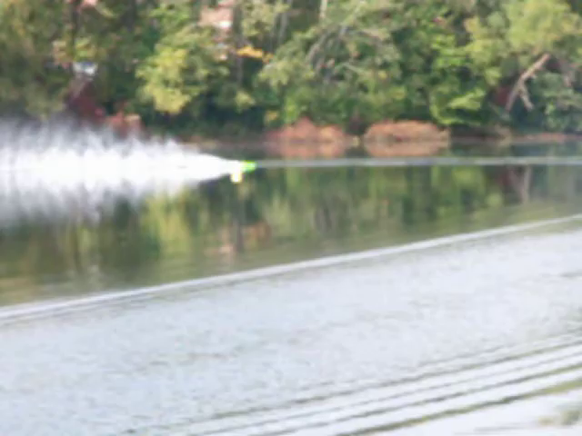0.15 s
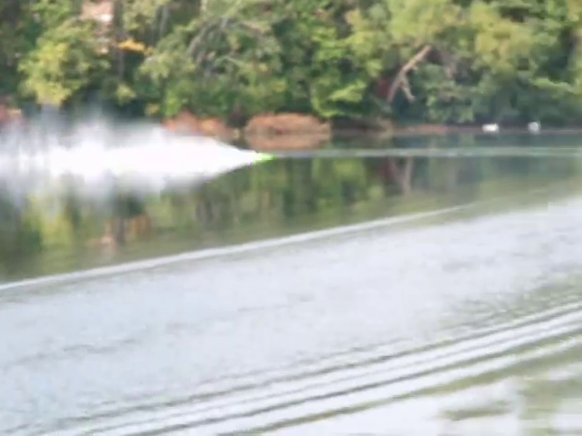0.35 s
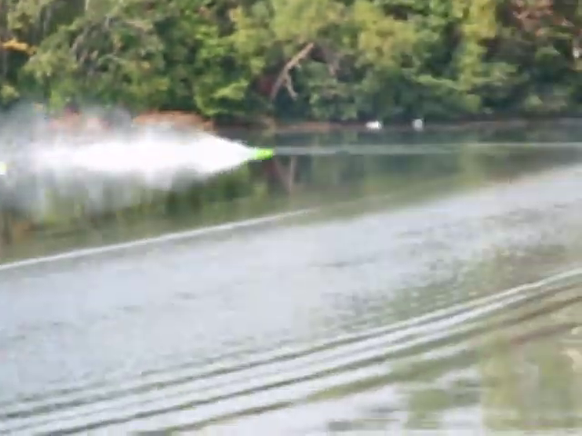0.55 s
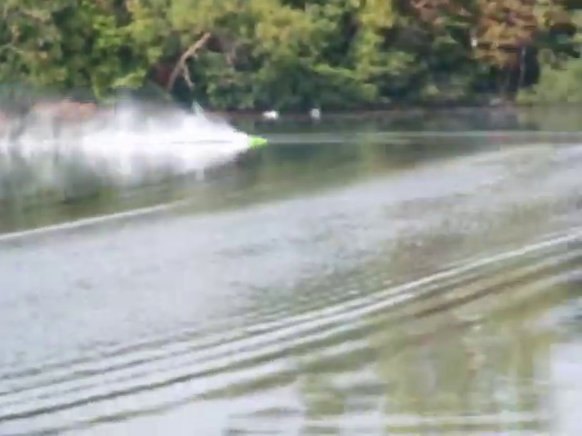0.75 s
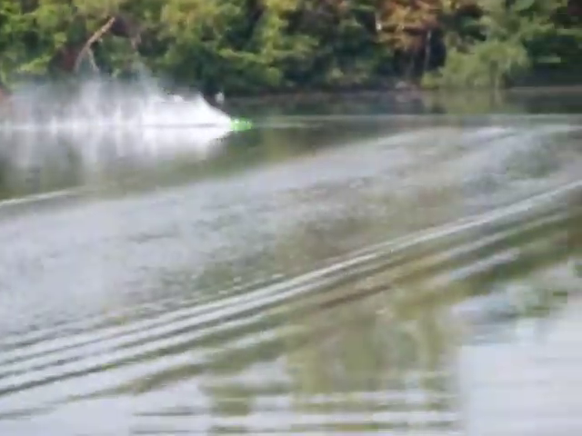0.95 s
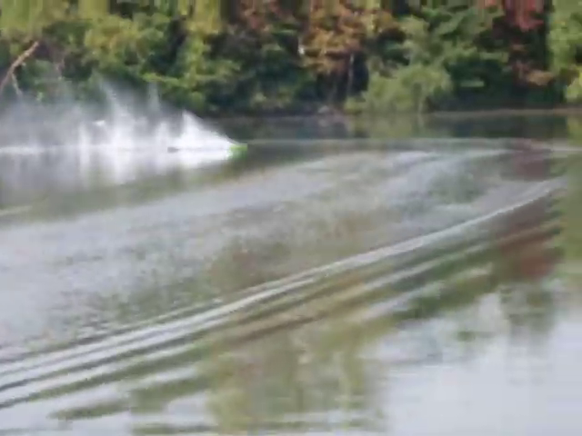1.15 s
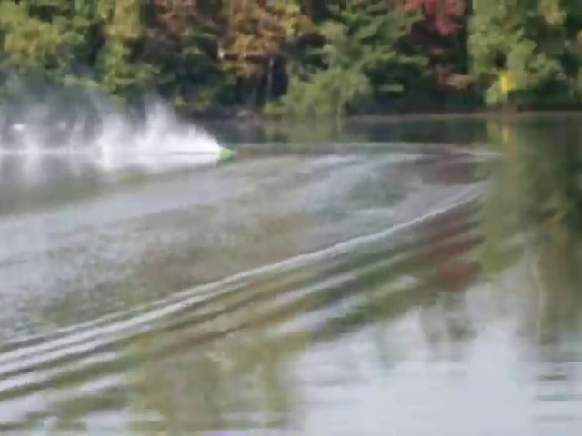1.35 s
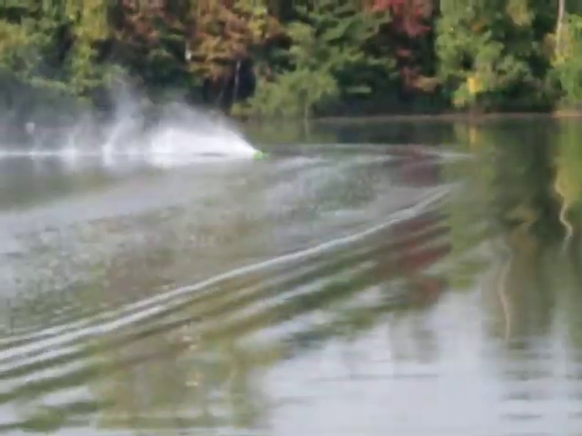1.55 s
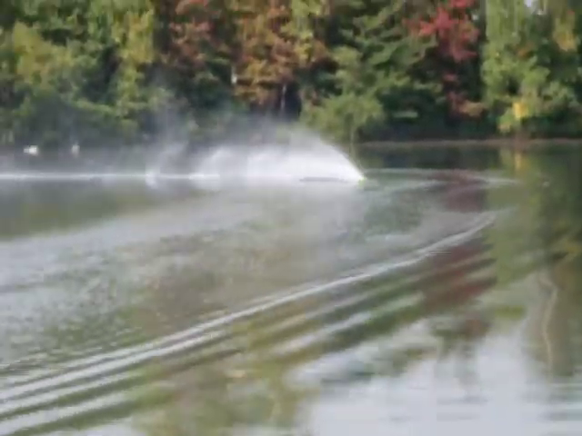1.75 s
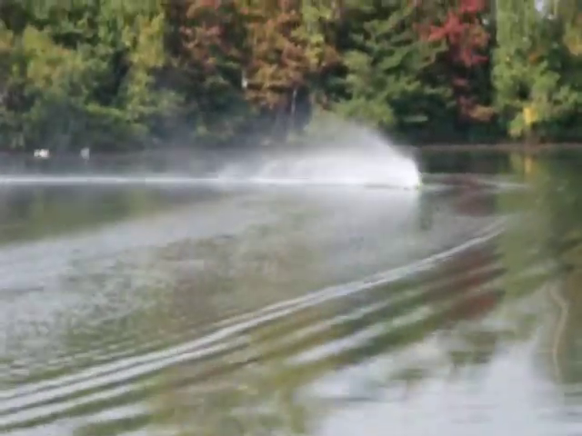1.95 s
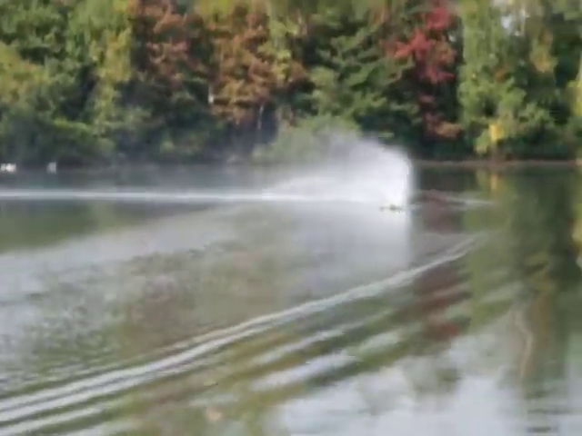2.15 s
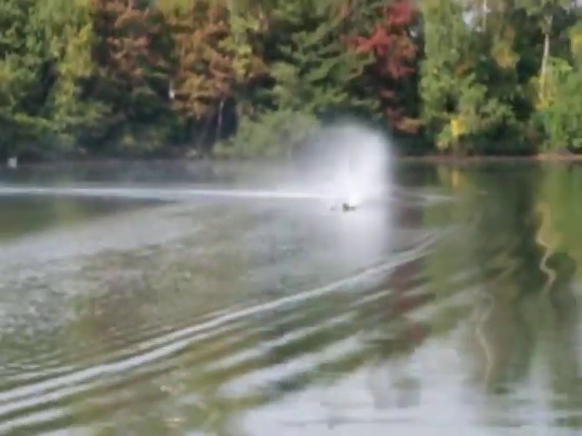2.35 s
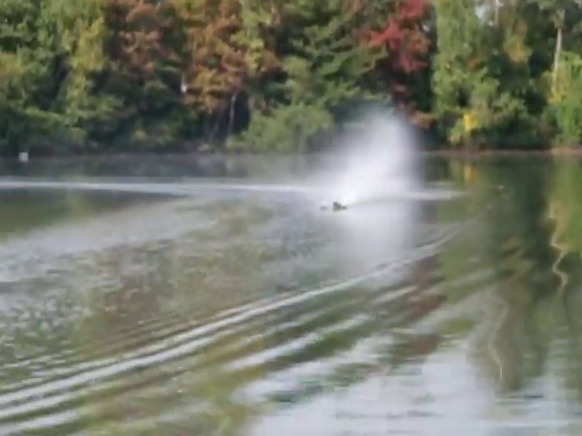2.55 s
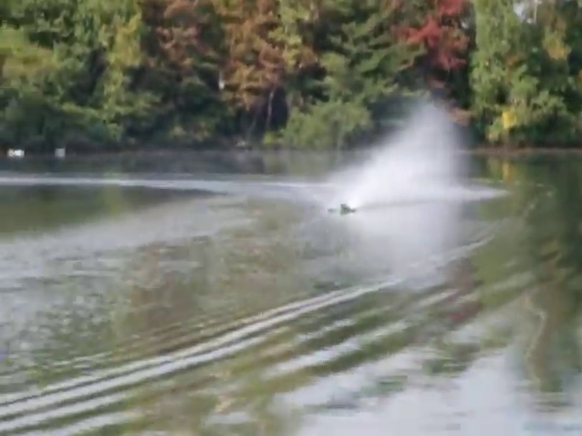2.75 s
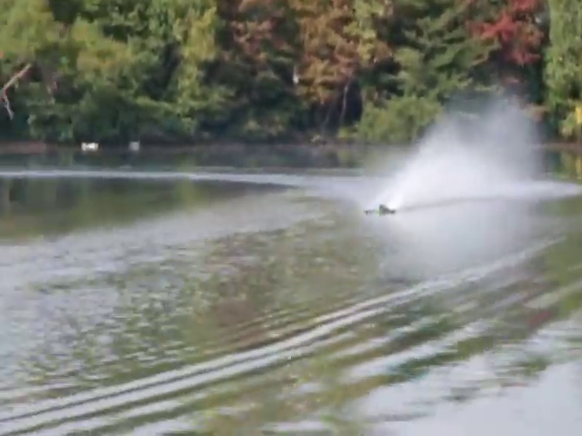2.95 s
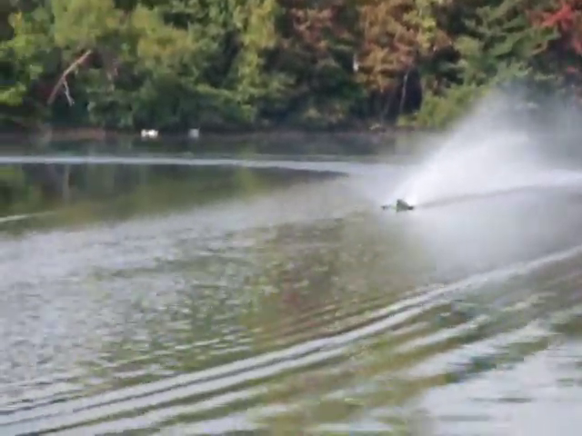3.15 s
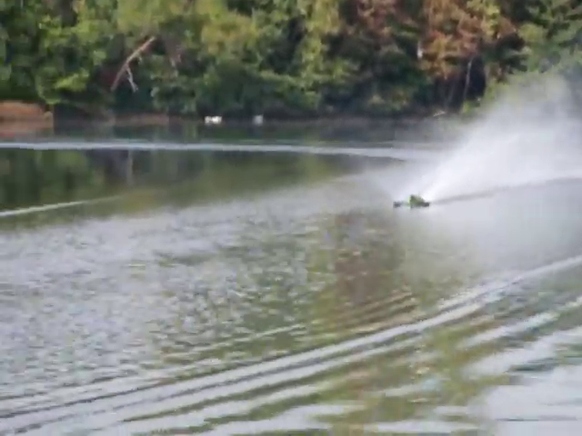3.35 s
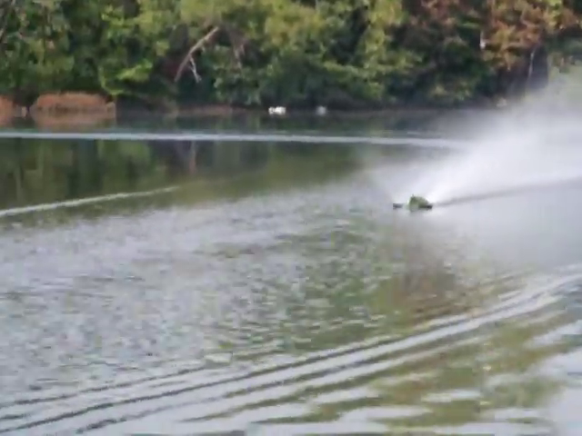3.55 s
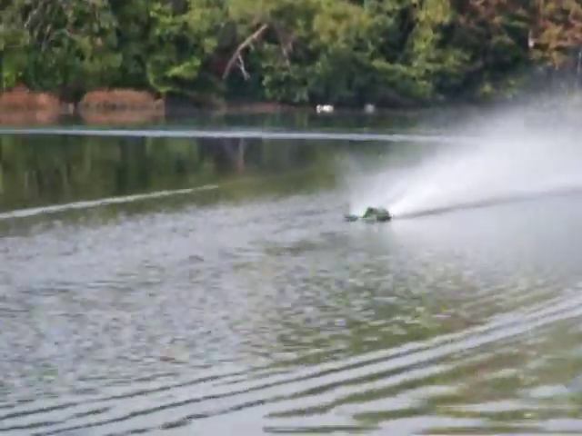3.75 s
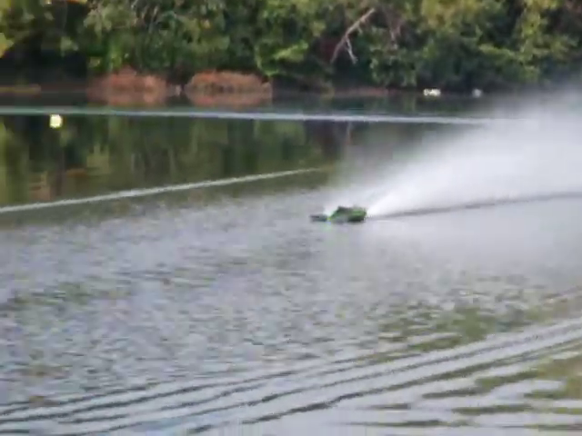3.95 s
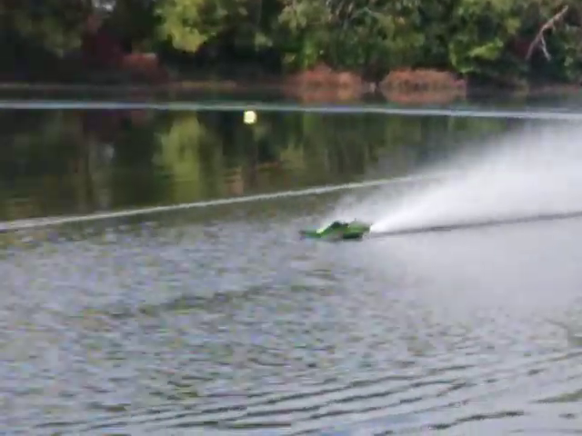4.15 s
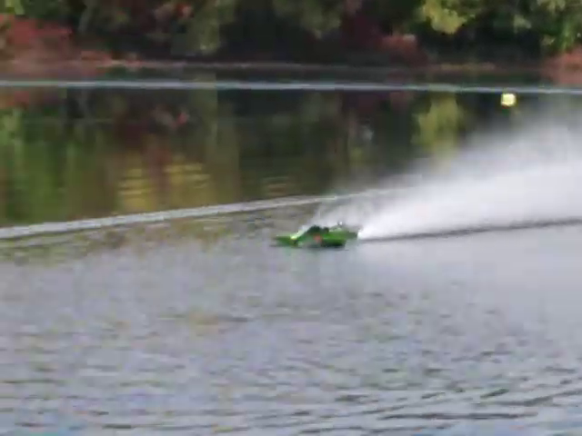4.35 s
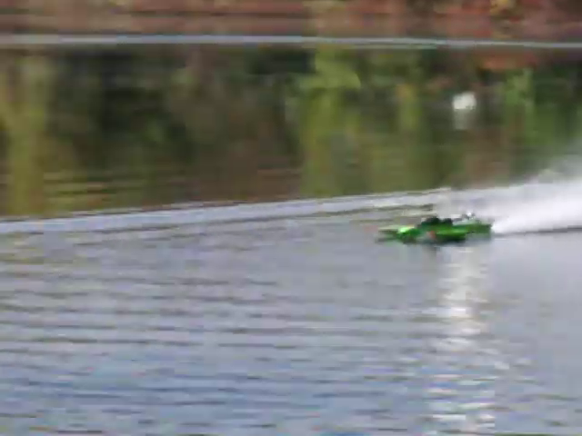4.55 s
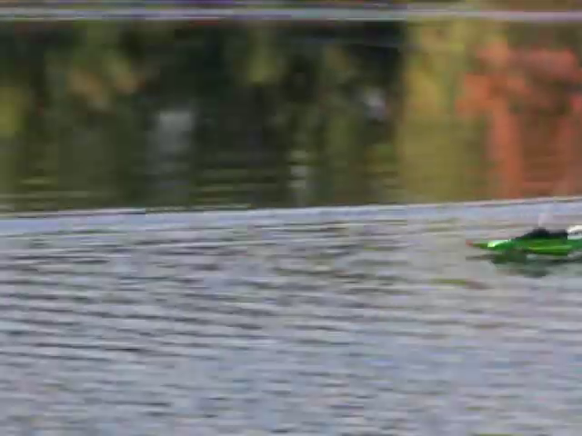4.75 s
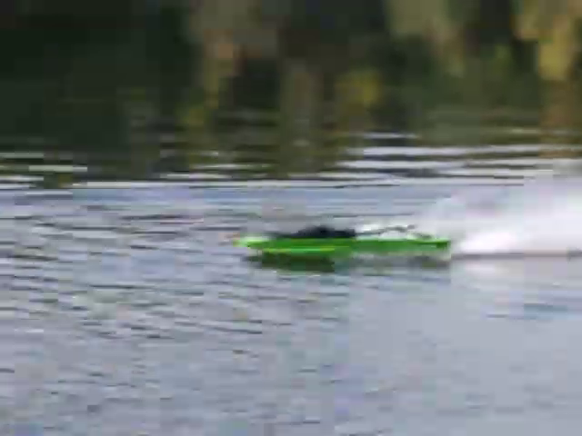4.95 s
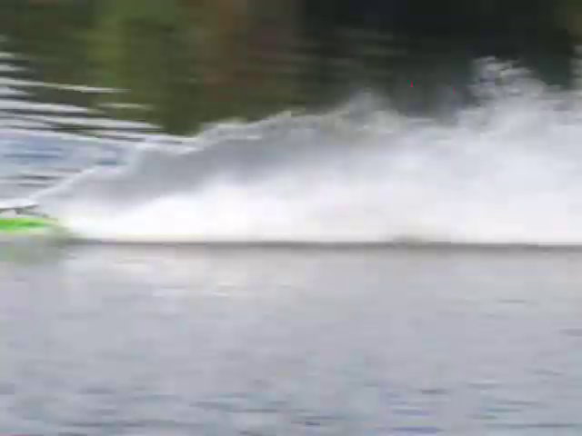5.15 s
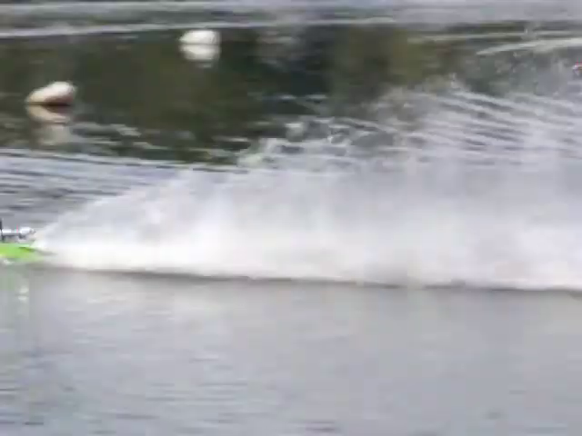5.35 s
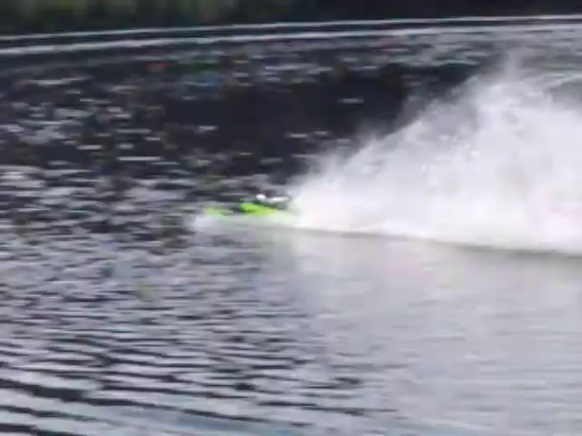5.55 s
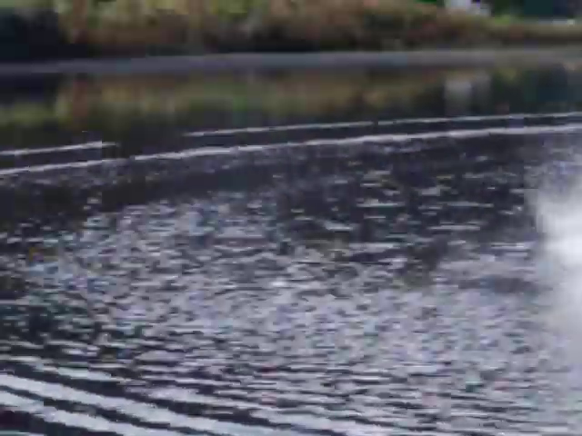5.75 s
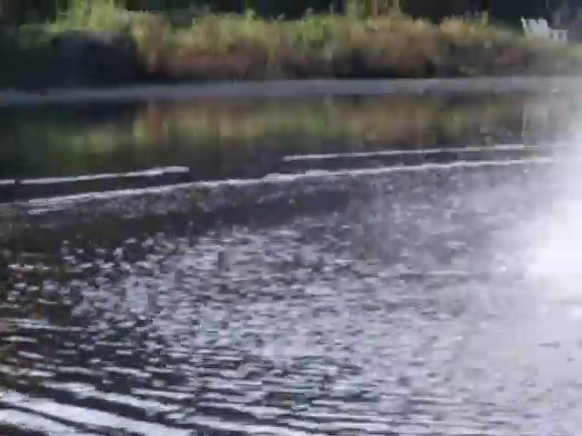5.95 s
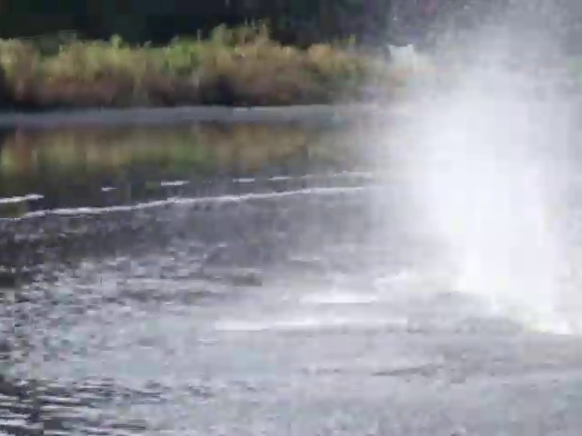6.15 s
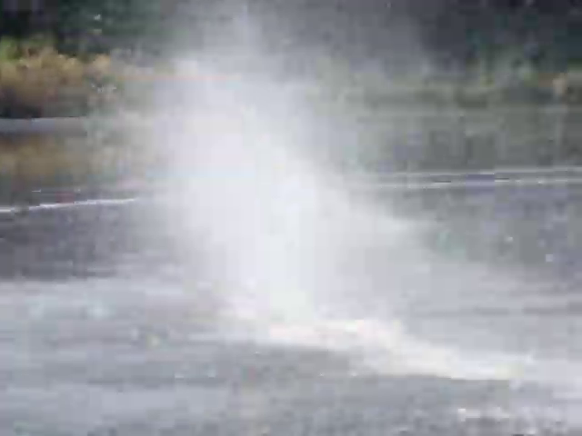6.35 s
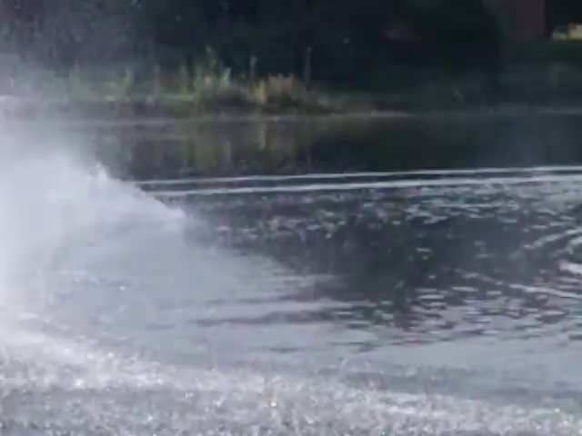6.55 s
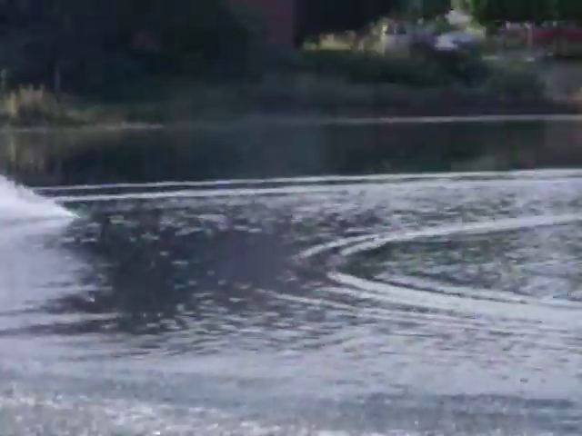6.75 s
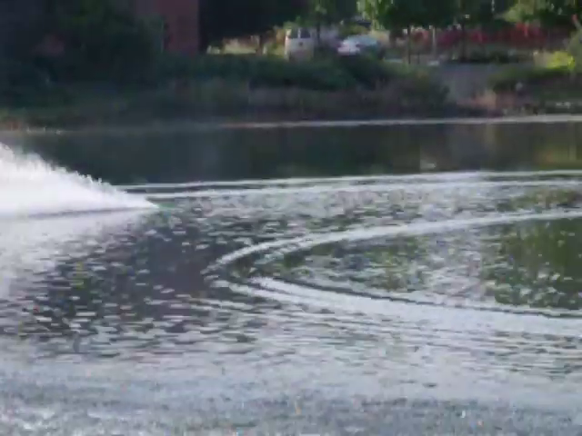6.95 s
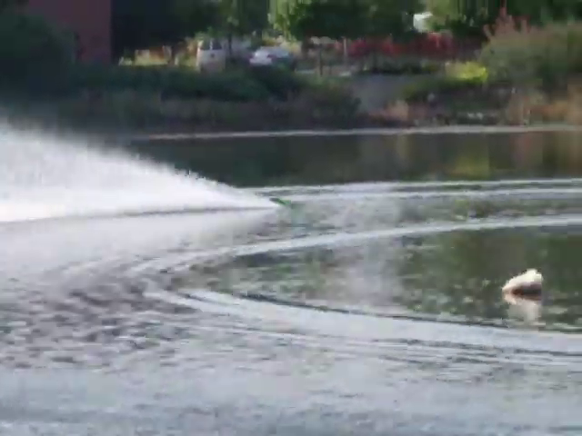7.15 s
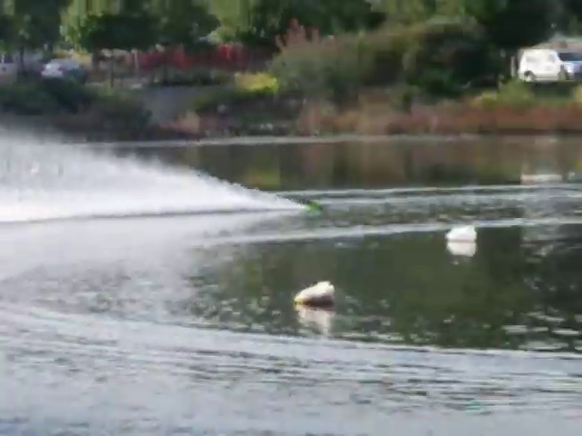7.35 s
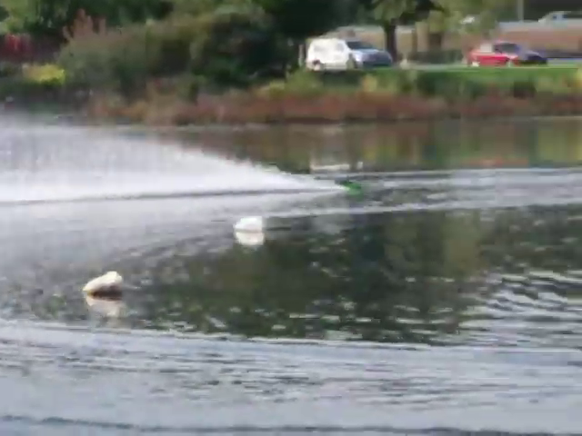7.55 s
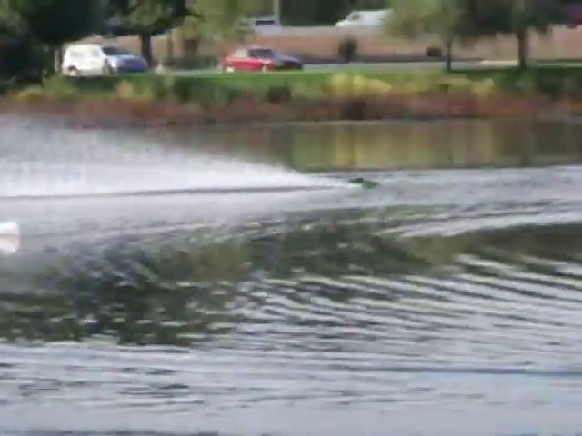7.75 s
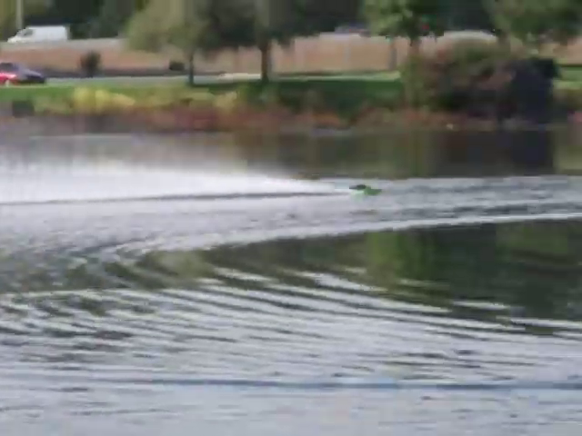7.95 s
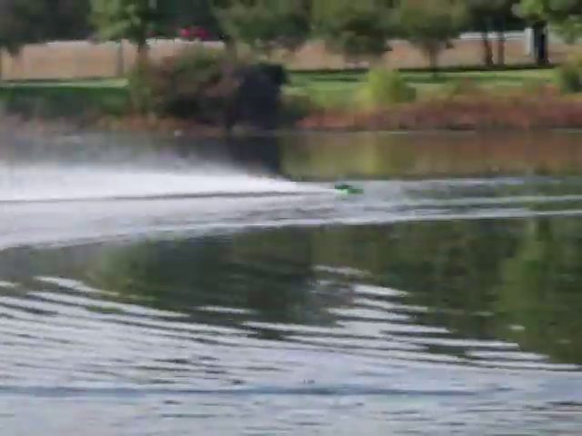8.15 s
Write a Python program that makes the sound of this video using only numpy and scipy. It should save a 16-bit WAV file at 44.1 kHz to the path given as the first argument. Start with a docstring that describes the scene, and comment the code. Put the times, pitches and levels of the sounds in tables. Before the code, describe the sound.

A small two-stroke model racing boat whines across a pond throughout, heard from the bank with rushing, hissing spray and a thin echo off the shore. Three tiny ticks sound by the microphone right at the start. From about 0.3 to 1.6 seconds the revs flare and sag rapidly as the hull skips. The high, buzzing whine then steadies and grows louder as the boat approaches. Two faint, short rising hoots come at about 3.3 and 4.6 seconds. Between 4.7 and 6 seconds the boat passes close and loud, with strong spray hiss, a low buffeting and slight overload; the revs flare again in quick bursts from 5.3 seconds while the pitch falls. After 6.5 seconds the engine carries on lower and quieter as the boat heads away, until about 8 seconds. A faint, low motor drones far off underneath.

```python
"""From the bank of a pond: a two-stroke racing model boat rounds the far end, tuned pipe whining, revs
flaring as the hull skips and the propeller loses grip. Spray hisses, the wooded shore scatters the treble
back, a distant motor drones and three ticks sound by the microphone. Two faint hoots rise as the boat
nears. Past five seconds it runs close by, skipping again, with a low buffeting, and overloads the
microphone; then its pitch drops and it heads away."""
import sys
import numpy as np
from scipy import signal
from scipy.fft import rfft, irfft, next_fast_len
from scipy.io import wavfile
from scipy.ndimage import uniform_filter1d

SR = 44100
rng = np.random.default_rng(int(sys.argv[2]) if len(sys.argv) > 2 else 0)


def wav_out(sig):
    """Save sig, one row per channel (or a flat mono array), as 16-bit PCM at SR to the path in sys.argv[1]."""
    wavfile.write(sys.argv[1], SR, np.round(np.clip(np.atleast_2d(sig).T, -1, 1) * 32767).astype(np.int16))


N = 361619
TIME = np.arange(N) / SR


def from_db(db):
    """Decibels as an amplitude factor."""
    return 10 ** (np.asarray(db) / 20)


def rms_one(x):
    """x scaled to rms 1."""
    return x / np.sqrt(np.mean(x ** 2) + 1e-20)


def in_time(rows):
    """A table's columns at every sample, joined by straight lines."""
    times, *columns = np.transpose(rows)
    return [np.interp(TIME, times, column) for column in columns]


def at_hz(spectrum, hz):
    """A spectrum's level in dB, read on a log-frequency axis."""
    known_hz, db = np.transpose(spectrum)
    return np.interp(np.log(hz), np.log(known_hz), db)


def drift(rate_hz):
    """Slow random wander, rms 1: noise at every 20th sample through a double one-pole low-pass."""
    pole = np.exp(-40 * np.pi * rate_hz / SR)
    noise = rng.standard_normal(N // 20 + 4002)
    slow = signal.lfilter([1], [1, -2 * pole, pole * pole], noise)[4000:]
    return np.interp(np.arange(N) / 20, np.arange(len(slow)), rms_one(slow))


def butter(x, hz, kind, order=2):
    """x through a flat-passband filter."""
    return signal.sosfilt(signal.butter(order, hz, kind, fs=SR, output="sos"), x)


def coloured(x, spectrum):
    """x shaped by a spectrum; rms 1."""
    size = next_fast_len(N)
    hz = np.maximum(np.fft.rfftfreq(size, 1 / SR), 1)
    return rms_one(irfft(rfft(x, size) * from_db(at_hz(spectrum, hz)), size)[:N])


def revs(recover_s=.05, flywheel_s=0.016):
    """Firing rate and its flare, in Hz: at each skip the engine races, then bogs as the propeller bites."""
    # firing rate with the propeller gripping, as heard on the bank: t/s, f/Hz
    cruise = [(0.0, 393.6), (0.24, 405.6), (0.52, 401.4), (0.65, 419.2), (0.82, 399.7), (1.68, 404.1),
              (1.87, 422), (2.21, 430), (2.83, 421.4), (2.97, 432), (3.17, 434.3), (3.91, 438.6),
              (4.36, 430.7), (4.76, 432.3), (5.03, 418.7), (5.27, 401.7), (5.61, 385.2), (5.95, 351.4),
              (6.37, 353.7), (6.56, 363.5), (6.81, 372.6), (7.29, 382.8), (7.66, 371.2), (7.72, 365.3),
              (8.2, 361)]
    # hull skips, before the flywheel rounds them: peak t/s, flare/Hz, sag/Hz, time in air/s, time to bite/s
    skips = [(0.33, 18.6, 4.4, 0.055, 0.0446), (0.404, 12, 15, 0.03, 0.035),
             (0.471, 17.5, 14.5, 0.022, 0.057), (0.558, 16.3, 6.2, 0.044, 0.059),
             (0.787, 91, 42, 0.063, 0.024), (0.898, 87, 28, 0.071, 0.02), (1.01, 73, 4.6, 0.057, 0.02),
             (1.097, 31, 33, 0.066, 0.061), (1.264, 35, 25, 0.091, 0.0335), (1.37, 49, 36, 0.035, 0.067),
             (1.491, 31, 10.8, 0.054, 0.059), (1.628, 8.1, 5.67, 0.052, 0.052),
             (5.299, 18.6, 7.8, 0.0234, 0.032), (5.422, 102, 38.5, 0.048, 0.04),
             (5.558, 85, 41, 0.066, 0.023), (5.676, 94, 45, 0.054, 0.042), (5.792, 35, 10.4, 0.058, 0.038),
             (5.906, 44, 2.1, 0.081, 0.04)]
    cruise_hz, = in_time(cruise)
    swings_hz = sum(np.interp(TIME - s, [-air_s, 0, bite_s, bite_s + recover_s], [0, peak_hz, -sag_hz, 0])
                    for s, peak_hz, sag_hz, air_s, bite_s in skips)
    flare_hz = uniform_filter1d(swings_hz, int(flywheel_s * SR))
    return cruise_hz + flare_hz, flare_hz


def crank(firing_hz, hunting=0.001224, jitter=0.003905):
    """Crank angle: the speed hunts a little, and no two firings push equally hard."""
    speed_hz = firing_hz * (1 + hunting * drift(17.85) + jitter * drift(200))
    return 2 * np.pi * np.cumsum(speed_hz) / SR


def exhaust(firing_hz, flare_hz, angle, mach=.057, rough_flare_hz=30, rough_span_s=.2):
    """One blast a turn makes 16 orders that slide through peaks and dips and vary as the boat turns."""
    # tone colour of the engine on board, with its peaks and dips: f/Hz, gain/dB
    colour = [(340.0, -1), (480.0, 7), (700.0, -5), (850.0, 4), (1180.0, 5.0), (1190.0, 0.3), (1630.0, 4.5),
              (2000.0, -14.5), (2300.0, -4), (2610.0, -13), (2900.0, -5.5), (3300.0, 2), (3770.0, -3.5),
              (3870.0, 7), (4590.0, -2.5), (4730.0, -13), (5090.0, -8), (5520.0, -27)]
    # engine at the microphone as the boat nears and leaves: t/s, relative level/dB
    loudness = [(0.0, -28), (0.3, -29.5), (0.45, -32.1), (0.75, -30.5), (1.7, -26.5), (2.5, -23.5),
                (3.2, -23), (3.6, -20.5), (4.15, -17.5), (4.8, -15.5), (5.3, -17), (5.5, -19), (5.8, -19.5),
                (6.1, -17.5), (6.5, -20.5), (6.85, -25.4), (7.1, -23.5), (7.4, -23), (7.7, -24.0),
                (8.2, -24.5)]
    # rough aim of the exhaust, 0 away from the microphone, 180 straight at it: t/s, aim/degrees
    heading = [(0.0, 120.0), (0.5, 120), (1.0, 38), (1.7, 41), (2.0, 44.5), (3.0, 47.2), (3.9, 32),
               (4.4, 34), (4.9, 75), (5.2, 65.3), (5.5, 96), (5.9, 100.5), (6.2, 87.5), (6.6, 155),
               (6.95, 159), (7.4, 107), (7.7, 119), (8.2, 126)]
    # sound sent each way, against order 1: aim/degrees, 2nd/dB, 3rd/dB, 4th/dB, rasp 5-9/dB, whine 10-16/dB
    beam = [(0.0, 6, -7.5, -18.5, -18, 1.7), (44.6, -0.4, -7.5, -8, -3, -7.5),
            (92.2, -5.1, -1.5, -0.2, -5, -4), (136, -13.7, -5, -10.5, -10.5, -3.5),
            (178, 9, -14, 3.5, -9.5, -5)]
    # treble, from the fifth order up: t/s, gain/dB
    treble = [(0.0, -3.0), (0.6, 0.5), (1.7, -3), (2.1, -1.1), (3.7, -0.7), (4.15, 2.5), (4.75, 0.4),
              (5.2, 5), (5.7, 3.5), (5.97, -11), (6.3, -4.5), (6.75, 2), (7.4, -1), (7.6, -4.5), (8.0, 5),
              (8.2, 3.7)]
    loudness_db, aim, treble_db = in_time(loudness) + in_time(heading) + in_time(treble)
    degrees, *lobes = np.transpose(beam)
    second, third, fourth, rasp, whine = [np.interp(aim, degrees, lobe) for lobe in lobes]
    # a racing engine booms, a bogging one growls; factors in dB per Hz of flare
    boom, growl = 0.0384 * flare_hz, -0.0272 * flare_hz
    treble_db -= 0.0019 * flare_hz
    orders_db = [boom, second + boom, third + growl, fourth + growl]
    orders_db += [rasp + treble_db] * 5 + [whine + treble_db] * 7
    # the boat's speed shifts the tone colour heard on the bank
    on_board_hz = firing_hz * (1 - mach * np.cos(np.radians(aim)))
    rough = np.minimum(uniform_filter1d(np.abs(flare_hz), int(rough_span_s * SR)) / rough_flare_hz, 1)
    out = np.zeros(N)
    for k, order_db in enumerate(orders_db, 1):
        # over rippled water short waves flutter most, and more while the hull skips
        flutter_db = (0.76 + 0.0918 * k + 2.0 * rough) * drift(21)
        if k > 2:
            flutter_db += 1.2 * drift(5)   # slower fading
        gain = from_db(loudness_db + order_db + at_hz(colour, k * on_board_hz) + flutter_db)
        out += gain * np.sin(k * angle + np.pi / 5 * k * k)   # the pipe spreads each blast over the turn
    return np.sqrt(2) * out * from_db(-0.25 * drift(150))


def wash(angle, puffing=0.34, splash_db=1.5, surge_db=1.42, rush_gain_db=-1.35, hiss_gain_db=-3.5):
    """Thrown water lands in dense splashes; gas hisses out in a puff with each firing."""
    # the boat's noise from the bank: t/s, relative rush level/dB, relative hiss level/dB
    levels = [(0.0, -27, -31.5), (0.5, -26, -28.5), (1.6, -27, -33), (3.1, -25.5, -27), (3.4, -25.5, -25),
              (4.5, -21.5, -16), (4.9, -16, -10.5), (5.5, -16.5, -8), (6.4, -24, -21.5), (8.2, -26, -24)]
    # rush of thrown water: f/Hz, relative level/dB
    rush_spectrum = [(60, -15), (180, -9.5), (330, -3), (480, -0.5), (700, -3.5), (850, 3), (1100, 1.5),
                     (1400, -0.5), (1680, -2.5), (1900, -12), (2300, -18.5), (3000, -28.5)]
    # hiss of exhaust and fine spray: f/Hz, relative level/dB
    hiss_spectrum = [(1500, -32.5), (2100, -9), (2750, -8), (3100, -2), (3500, -0.5), (3900, 1), (4250, -1),
                     (4600, -8.5), (5100, -5.5), (5600, -5.5), (6200, -36)]
    rush_db, hiss_db = in_time(levels)
    splashes = rng.standard_normal(N) * from_db(splash_db * drift(130))
    puffs = rng.standard_normal(N) * (1 + puffing * np.cos(angle))
    rush = from_db(rush_db + rush_gain_db + surge_db * drift(18)) * coloured(splashes, rush_spectrum)
    hiss = from_db(hiss_db + hiss_gain_db + surge_db * drift(17)) * coloured(puffs, hiss_spectrum)
    return rush + hiss


def shore(engine, first_s=0.03, t60_s=0.98, low_cut_hz=1800):
    """Banks and trees round the pond return a thin, dying scatter of the upper orders."""
    # the shore's treble echo, swelling just after the pass: t/s, relative level/dB
    levels = [(0, -7.5), (1.5, -10), (3, -12), (4.3, -12.5), (5.4, -13.5), (6, -3), (7, -15.5), (8.2, -12)]
    echo_db, = in_time(levels)
    t = TIME[:SR]
    scatter = rng.standard_normal(SR) * from_db(-60 * t / t60_s) * (t > first_s)
    echo = signal.fftconvolve(engine * from_db(echo_db), scatter / np.linalg.norm(scatter))[:N]
    return butter(echo, low_cut_hz, "high", order=1)


def distant_motor(tones_hz=(75, 135.2), waver=0.034, upper_db=-47, rumble_db=-44, rumble_hz=(100, 260)):
    """A motor far away drones: two wavering low tones over a steady rumble."""
    # the motor's lower tone: t/s, level/dB
    levels = [(0, -49.5), (4.5, -43), (5.9, -46), (6.2, -37), (7.2, -37), (8.2, -40.5)]
    low_db, = in_time(levels)
    low, upper = [np.sin(2 * np.pi * np.cumsum(hz * (1 + waver * drift(12))) / SR) for hz in tones_hz]
    tones = from_db(low_db + drift(5)) * low + from_db(upper_db + 2 * drift(3)) * upper
    rumble = rms_one(butter(rng.standard_normal(N), rumble_hz, "band"))
    return np.sqrt(2) * tones + from_db(rumble_db) * rumble


def ticks(width_s=0.004, band_hz=(1000, 2700)):
    """Three small ticks close to the microphone, each a scratch of a few milliseconds."""
    # the ticks at their peaks: t/s, level/dB
    peaks = [(.053, -25), (.087, -29), (.130, -29)]
    bursts = sum(from_db(db) * np.exp(-.5 * ((TIME - s) / width_s) ** 2) for s, db in peaks)
    return bursts * rms_one(butter(rng.standard_normal(N), band_hz, "band", order=4))


def hoots(octave_db=-9):
    """Short, nearly pure notes that slide upward, perhaps from water birds."""
    # faint hoots: middle t/s, length/s, start f/Hz, end f/Hz, level/dB
    notes = [(3.253, 0.13, 654, 724, -26), (4.594, 0.1, 573, 636, -23)]
    out = np.zeros(N)
    for s, length_s, start_hz, end_hz, db in notes:
        along = np.clip((TIME - s) / length_s + .5, 0, 1)
        pitch_hz = start_hz + (end_hz - start_hz) * np.sin(along * np.pi / 2)
        phase = 2 * np.pi * np.cumsum(pitch_hz) / SR
        tone = np.sin(phase) + from_db(octave_db) * np.sin(2 * phase)
        out += from_db(db) * np.sin(np.pi * along) * tone
    return out


def buffet(band_hz=(14, 110), lumpy_db=3):
    """A lumpy low rumble that swells as the boat passes the microphone."""
    # buffeting on the bank: t/s, level/dB
    levels = [(0, -47), (4.3, -52), (4.7, -37), (5.55, -27.5), (5.9, -59.5), (8.2, -57)]
    level_db, = in_time(levels)
    air = butter(rng.standard_normal(N), band_hz, "band") * from_db(lumpy_db * drift(5.2))
    return from_db(level_db) * rms_one(air)


def scene():
    """The boat and the pond as they reach one microphone on the bank."""
    firing_hz, flare_hz = revs()
    angle = crank(firing_hz)
    engine = exhaust(firing_hz, flare_hz, angle)
    return (engine + shore(engine) + wash(angle) + buffet() + distant_motor() + ticks() + hoots())[None]


def record(dry, recorder_hz=11025, band_hz=5600, ceiling=.75, knee=30.0, splatter_db=-3.0, top_hz=15900):
    """Slow sampling adds a mirrored fringe at the top; the close pass overloads and splatters."""
    hop = round(SR / recorder_hz)
    narrow = signal.fftconvolve(dry[0], signal.firwin(201, band_hz, fs=SR), "same")
    sampled = hop * narrow * (np.arange(N) % hop == 0)
    smooth = signal.fftconvolve(sampled, signal.firwin(121, band_hz, window="blackman", fs=SR), "same")
    clipped = smooth / (1 + np.abs(smooth / ceiling) ** knee) ** (1 / knee)
    body = signal.sosfiltfilt(signal.butter(6, 6500, fs=SR, output="sos"), clipped)
    splatter = from_db(splatter_db) * (clipped - body)
    return signal.sosfiltfilt(signal.ellip(8, .05, 60, top_hz, fs=SR, output="sos"), body + splatter)[None]


dry = scene()
out = record(dry)
wav_out(out)
```